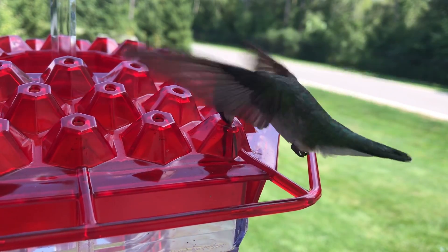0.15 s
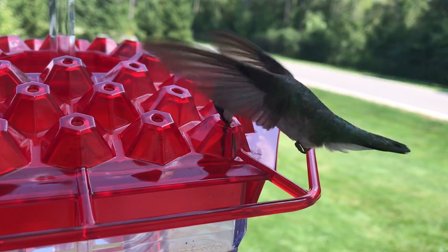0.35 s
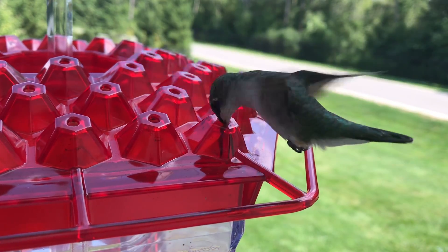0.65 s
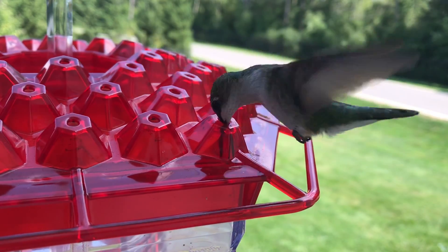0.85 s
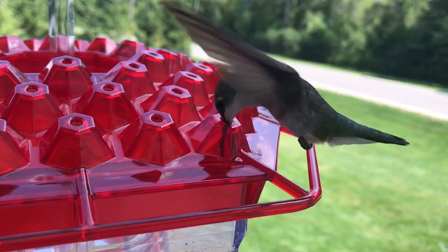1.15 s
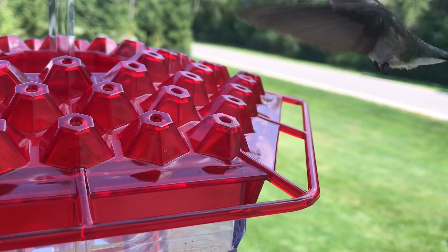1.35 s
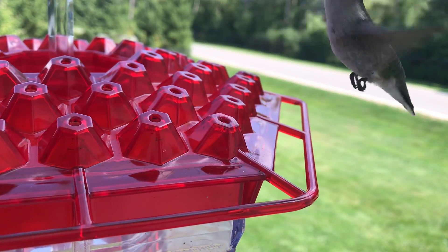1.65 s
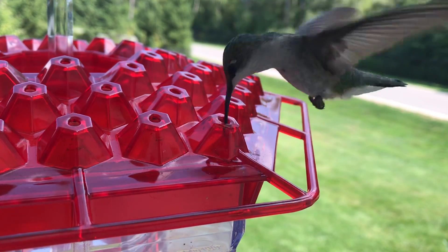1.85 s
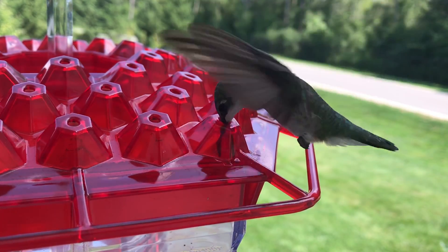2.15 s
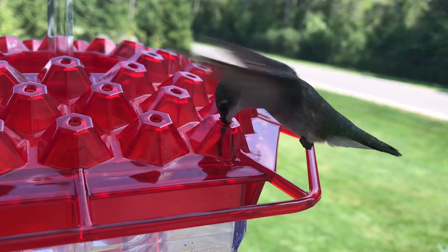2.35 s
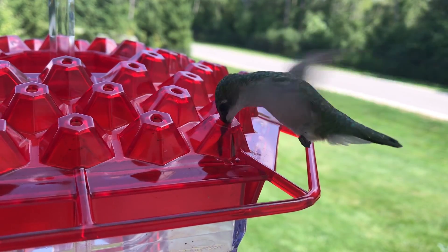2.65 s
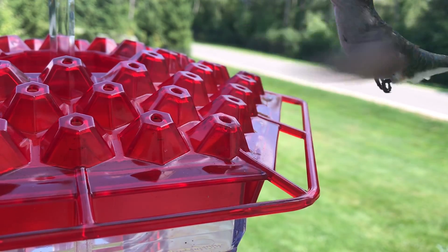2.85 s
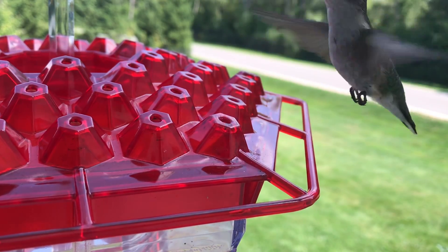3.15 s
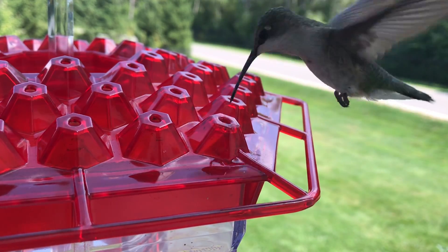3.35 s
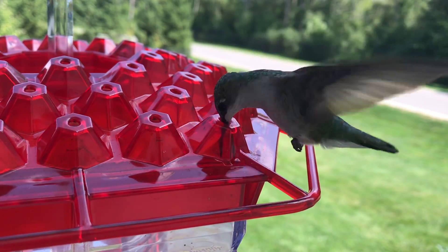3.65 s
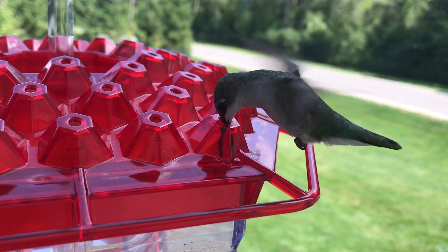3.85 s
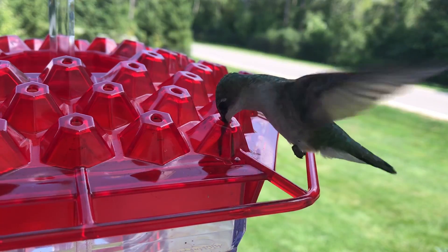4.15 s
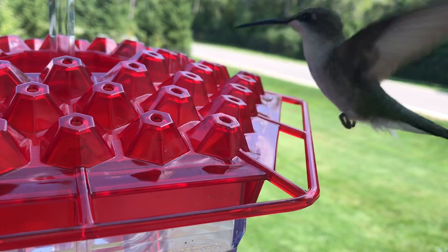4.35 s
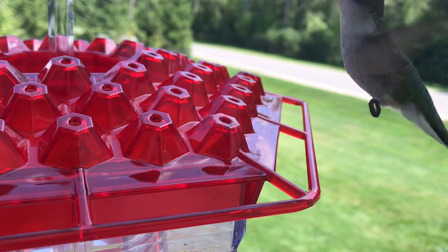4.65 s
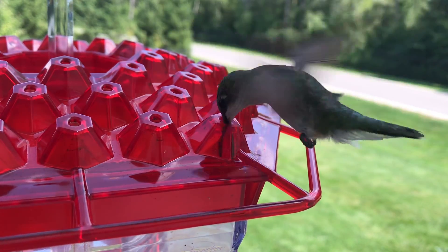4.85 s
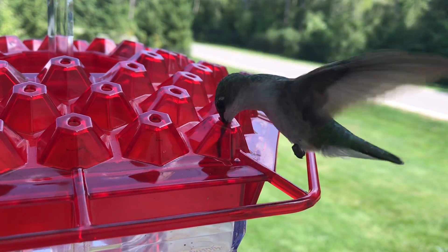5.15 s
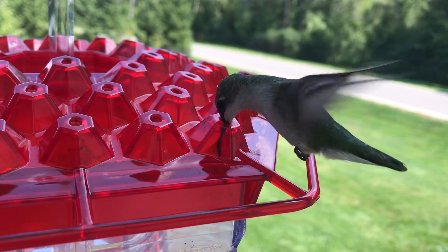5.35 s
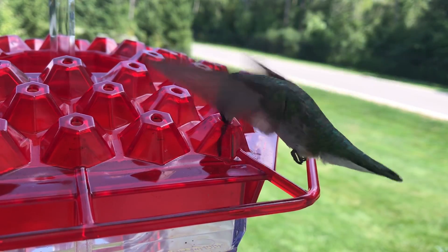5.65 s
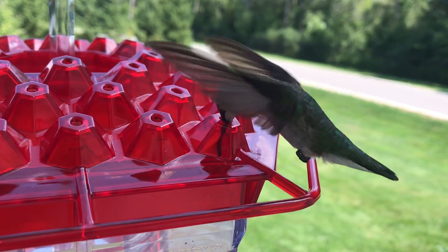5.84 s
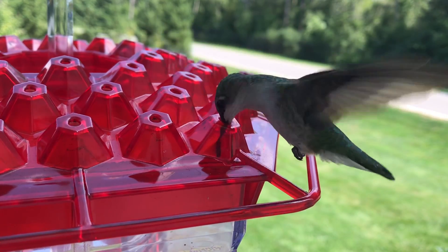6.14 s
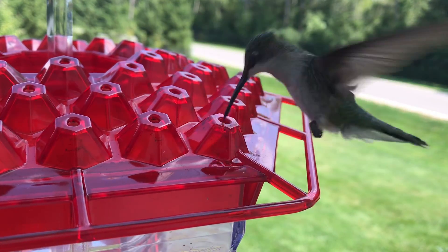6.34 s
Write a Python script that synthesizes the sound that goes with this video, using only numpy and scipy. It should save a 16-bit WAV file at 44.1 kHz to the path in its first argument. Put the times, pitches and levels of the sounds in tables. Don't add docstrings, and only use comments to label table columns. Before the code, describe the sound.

A hummingbird's wings drone in a low, fluttering hum close to the microphone, with crisp feather ticks and brief swells as it darts outdoors.

```python
import sys
import numpy as np
from scipy import signal
from scipy.fft import rfft, irfft, next_fast_len
from scipy.io import wavfile
from scipy.ndimage import map_coordinates

SR = 44100
rng = np.random.default_rng(int(sys.argv[2]) if len(sys.argv) > 2 else 0)


def volts_from_db(level):
    exponent = np.asarray(level, float) / 20
    return 10 ** exponent


def waveform_to_disk(signal):
    frames = np.transpose(np.atleast_2d(signal))
    scaled = np.clip(frames, -1, 1) * 32767
    samples = np.round(scaled).astype(np.int16)
    wavfile.write(sys.argv[1], SR, samples)


N = 286456

# time_s, beat_rate_hz
HOVER_BEAT = [(0.0, 47.37), (0.09, 47.55), (0.158, 45.61), (0.763, 44.1), (0.924, 46.51), (1.139, 44.72),
              (1.562, 47.78), (1.787, 42.58), (2.278, 46.87), (2.357, 44.7), (3.004, 46.56), (3.465, 41.0),
              (3.673, 43.78), (4.367, 43.91), (4.58, 48.06), (4.779, 42.55), (5.1, 44.72), (6.5, 44.64)]
# time_s, rise_hz, sag_hz, half_length_s
DARTS = [
    (1.299, 5.69, 6.37, .048),
    (2.023, 6.47, 0, .077),
    (2.841, 1.86, 4.8, .083),
    (3.566, 6.4, 0, .08),
    (4.418, 6.38, 6.71, .046),
    (4.996, 5.4, 1.31, .09),
    (6.345, -1.9, 0, .04),
    (6.435, 7.2, 0, .036),
]
# time_s, extra_air_db, half_length_s, swell_db
SURGES = [
    (1.315, 7.5, 0.035, 11.5),
    (2.055, 5, 0.043, 5),
    (2.826, 13, 0.028, 8.5),
    (3.602, 1, 0.033, 5.5),
    (4.426, 7, 0.025, 6.5),
    (5.002, 4, 0.027, 3),
    (6.447, 11, 0.037, 4),
]
# time_s, thrust_db, body_bob_db, stroke_sharpness_db, posture (0 bill in feeder, 1 upright backed off)
HOVER = [(0.0, -40, -42.5, -41.4, 0.031), (0.48, -41.5, -55.5, -52.5, 0.29),
         (0.86, -41.5, -41.5, -40.5, 0.05), (1.13, -39, -60, -48, 0.52), (1.48, -53.5, -52.7, -57, 0.84),
         (1.58, -46.0, -41.5, -47, 1), (1.77, -49.5, -46, -51.5, 0.8), (2.05, -42, -49.5, -46, 0.88),
         (2.37, -41, -44, -57.5, 0.7), (2.7, -43, -52, -57, 0.32), (3.0, -46.5, -50, -55.5, 0.74),
         (3.12, -42.5, -46, -48.5, 0.8), (3.32, -47, -47.5, -51.8, 0.68), (3.58, -41, -51.8, -50.5, 0.46),
         (4.18, -43, -64, -56.5, 0.078), (4.83, -36, -57, -54, 0.00055), (5.53, -38, -60, -53, -0.011),
         (6.5, -38.5, -51.5, -51.5, 0.21)]
# time_s, lopsided_db (once a beat), even_db (on both strokes)
TIPS = [(0, -53.5, -64), (.3, -55, -51), (.65, -58.5, -55.5), (1.1, -52, -60), (1.7, -51.5, -50),
        (2.1, -64, -51.5), (2.3, -63, -52.5), (2.75, -61, -59), (3, -54.5, -58), (3.35, -52, -55),
        (3.9, -53.5, -55), (4.3, -55, -57.5), (4.7, -52, -53), (5.3, -54.5, -56.5), (5.7, -55.5, -54),
        (6, -62, -55), (6.5, -59, -53)]
# multiple, level_column, share_db, lead_feeding_turns, lead_backed_off_turns
HARMONICS = [(1, 0, 0, .68, .21), (2, 1, 0, .37, .17), (3, 2, 0, .48, -.03), (4, 3, 0, .68, .12),
             (5, 4, -6, .75, .43), (6, 5, -5, .25, .31), (7, 4, -7, .49, .43), (8, 5, -13, .97, .11),
             (9, 4, -19, .38, .73)]
RAIL_DB = [5, 10.5, 0.33, .1, .1, 0.088]
SWELL_SHARE = [1.15, 1.1, 0.75, 0.37, .15, .05]
FADE_DB = [2.8, 0.63, 1.6, 1.6, 0.32, 0.36]
FADE_RATE = [16, 9, 11, 8.3, 7, 7]
# frequency_hz, density_db
WASH = [(40, -44), (75, -5.5), (110, 0), (160, 0.5), (200, -7.5), (290, -6.5), (400, -14), (480, -23.5),
        (700, -30.5), (1500, -112)]
# frequency_hz, density_db
BUFFET = [(16, -35), (28, -32), (45, -0.5), (65, 10.5), (80, -14), (110, -35), (200, -59)]
# time_s, peak_db, pitch_hz, lead_turns
THUMPS = [(2.131, -25, 96, .84), (3.3188, -32.5, 176, .32), (2.9, -40, 190, .27), (3.413, -37, 176, .32),
          (1.853, -35, 98, .4), (2.353, -31.5, 74, .48), (5.739, -39, 90, .66), (2.844, -30, 88, .45),
          (4.418, -34.5, 240, .02), (4.438, -34, 160, .088), (2.822, -35, 230, .02)]
# frequency_hz, density_db
SNAP = [(1760, -24), (3000, -12.5), (4870, -12.5), (6170, -3), (7040, -4), (7700, -6), (8790, -2),
        (10300, -6), (12400, -1.5), (15100, 0), (15700, -1)]
# time_s, peak_db
HARD_SNAPS = [(1.1408, -36), (1.2082, -38), (1.3324, -35), (2.2972, -37), (2.4299, -37), (2.4518, -39),
              (2.7152, -37), (2.9337, -40), (3.0255, -35), (3.0919, -39), (3.1138, -38), (3.1363, -37),
              (3.1582, -37), (3.3418, -38), (3.5902, -37), (4.5366, -38), (4.6927, -38), (5.0035, -37),
              (5.1547, -39), (5.3108, -37), (6.0057, -35), (6.0282, -39), (6.1848, -36), (6.2966, -38),
              (6.3654, -37)]
# frequency_hz, density_db
VORTEX = [(260, -47), (450, 0), (600, -0.5), (700, -9), (1100, -6), (1300, -9), (1850, -10), (2250, -18),
          (3200, -16), (4800, -23), (6240, -21), (10600, -120)]
# frequency_hz, density_db
GARDEN = [(60, -4), (300, -4.5), (700, 1), (1700, -2.5), (2400, -7.5), (3300, -8), (4900, -10.5),
          (6300, -7.5), (7700, -8), (8800, -10.5), (10400, -14), (12500, -13.5), (15700, -20)]
# frequency_hz, half_width_hz, gain_db
PORT_DIPS = [(4810, 180, 0), (7700, 170, -4.5), (10370, 230, -6)]


def seconds():
    return np.arange(N) / SR


def unit(x):
    return x / np.sqrt(np.mean(x ** 2) + 1e-20)


def curves(rows):
    s, *columns = np.transpose(rows)
    return [np.interp(seconds(), s, column) for column in columns]


def bumps(rows):
    t = np.arange(0, N + 64, 32) / SR
    total = sum(height * np.exp(-((t - s) / half_s) ** 2) for s, height, half_s in rows)
    return np.interp(seconds(), t, total)


def wobble(rate):
    knots = rng.standard_normal(int(N * 100 / SR) + 4)
    return map_coordinates(knots, [np.arange(N) * min(rate, 99) / SR])


def coloured(x, spectrum):
    size = next_fast_len(N + 8192)
    hz, db = np.transpose(spectrum)
    log_hz = np.log(np.fft.rfftfreq(size, 1 / SR) + 1)
    gain = volts_from_db(np.interp(log_hz, np.log(hz + 1), db))
    return unit(irfft(rfft(x, size) * gain, size)[:N])


def sag():
    delay_s, half_s = .0972, .07
    return bumps([(s + delay_s, drop, half_s) for s, _, drop, _ in DARTS])


def beat_rate():
    return curves(HOVER_BEAT)[0] + bumps([(s, rise, half_s) for s, rise, _, half_s in DARTS]) - sag()


def turns():
    return .1412 + np.cumsum(beat_rate()) / SR


def surge_db():
    return bumps([row[:3] for row in SURGES])


def swell_db():
    return bumps([(s, db, 1.32 * half_s) for s, _, half_s, db in SURGES])


def loose():
    off_s, on_s, let_go_s = 4.248, 5.73, 0.0054
    t = seconds()
    return (np.tanh((t - off_s) / let_go_s) - np.tanh((t - on_s) / let_go_s)) / 2


def stroke(at, rise_s, fall_s, scatter_db, scatter_turns):
    since = turns() - at
    beat = np.floor(since + .5).astype(int) + 1
    chance = rng.standard_normal((400, 2))[beat]
    late_turns = since - beat + 1 - scatter_turns * chance[:, 0]
    late_s = late_turns / beat_rate()
    pulse = np.exp(np.where(late_s < 0, late_s / rise_s, -late_s / fall_s))
    return volts_from_db(scatter_db * chance[:, 1]) * pulse


def wing_levels():
    thrust, bob, sharp, away = curves(HOVER)
    fourth = 20 * np.log10(np.hypot(volts_from_db(sharp - 7.5), volts_from_db(-55 - 12.5 * away)))
    steady = [bob, thrust, sharp, fourth] + curves(TIPS)
    off, swell = loose(), swell_db()
    columns = zip(steady, RAIL_DB, SWELL_SHARE, FADE_DB, FADE_RATE)
    return [db - rail * off + share * swell + fade * wobble(rate)
            for db, rail, share, fade, rate in columns]


def hum():
    away, levels, out = curves(HOVER)[3], wing_levels(), 0
    clock = turns() + (.006 + .007 * away) * wobble(40)
    sharper_db = 0.48 * surge_db()
    upright_db = 4.2 * away
    effort_db = (.9 + 1.1 * np.abs(away)) * wobble(45)
    for k, column, share_db, feeding, backed in HARMONICS:
        lead = feeding + (backed - feeding) * away + .007 * k * wobble(7)
        level_db = levels[column] + share_db + effort_db + .18 * k * wobble(9)
        level_db = level_db + (k > 3) * sharper_db + (k in (5, 8, 9)) * upright_db
        out = out + np.sqrt(2) * volts_from_db(level_db) * np.cos(2 * np.pi * (k * clock + lead))
    return out


def gusts():
    t, out = seconds(), np.zeros(N)
    for s, db, hz, lead in THUMPS:
        wave = np.cos(2 * np.pi * (hz * (t - s) + lead))
        out += volts_from_db(db) * wave * np.exp(-((t - s) * hz / 0.68) ** 2)
    return out


def downwash():
    off = loose()
    bob_db = curves(HOVER)[1] - RAIL_DB[0] * off
    flow_db = -51.1 + 0.07 * (bob_db - bob_db.mean()) - 0.5 * off
    flow_db = flow_db + 2 * wobble(5) + 1.4 * curves(HOVER)[3] + 0.4 * surge_db()
    pulse = .5 + stroke(0.097, 0.0039, 0.007, 2.4, 0.027)
    wash = volts_from_db(flow_db) * coloured(pulse * rng.standard_normal(N), WASH)
    buffet = volts_from_db(.75 * bob_db - 15.5) * coloured(rng.standard_normal(N), BUFFET)
    return wash + buffet + gusts()


def hard_snaps():
    t, hard = seconds(), np.zeros(N)
    for s, db in HARD_SNAPS:
        hard += volts_from_db(db + 54.0) * np.exp(-np.abs(t - s - .001) / 0.00018)
    return hard * rng.choice([-1, 1], N)


def downstroke(level_db):
    build = stroke(.99, .0015, .0008, 1.2, .008)
    crack = stroke(.995, .00025, .00025, 2.2, .012)
    rustle = (1.5 * build + 0.35 * crack) * rng.standard_normal(N)
    return volts_from_db(level_db) * coloured(rustle + 0.48 * hard_snaps(), SNAP)


def upstroke(level_db):
    swish = stroke(.47, .0006, .0019, 1.8, .012)
    brighter = [(hz, db + 2.8 * np.log2(hz / 12000)) for hz, db in SNAP]
    return volts_from_db(level_db) * coloured(swish * rng.standard_normal(N), brighter)


def vortices(level_db):
    up = stroke(.534, .0016, .0027, 2.6, .04)
    shed = 0.5 + up + 0.98 * stroke(.12, 0.0023, 0.0025, 0.98, 0.029)
    return volts_from_db(level_db) * coloured(shed * rng.standard_normal(N), VORTEX)


def feathers():
    thrust, _, _, away = curves(HOVER)
    thrust_db = thrust - RAIL_DB[1] * loose()
    swell, surge, slack = swell_db(), surge_db(), sag()
    vortex_db = -61.5 + .5 * swell + 0.33 * surge - .5 * slack
    vortex_db = vortex_db + 0.21 * (thrust_db - thrust_db.mean()) + 0.57 * wobble(7)
    snap_db = -59 + 0.33 * swell + 0.11 * surge - .4 * slack + 0.43 * wobble(3.9)
    down = downstroke(snap_db + .7 + 0.64 * away)
    up = upstroke(snap_db - 1.0 - 1.2 * away)
    return down + up + vortices(vortex_db)


def garden():
    return volts_from_db(-62.5 + 0.067 * wobble(1.35)) * coloured(rng.standard_normal(N), GARDEN)


def scene():
    return (hum() + downwash() + feathers() + garden())[None]


def top_cut(x):
    return signal.sosfilt(signal.butter(12, 15880, fs=SR, output="sos"), x)


def record(dry):
    hz = np.fft.rfftfreq(N, 1 / SR)
    port_db = sum(db * np.exp(-((hz - dip_hz) / width_hz) ** 2) for dip_hz, width_hz, db in PORT_DIPS)
    below_limit = hz < 15850
    mix = irfft(rfft(dry) * volts_from_db(port_db) * below_limit, N)
    return top_cut(mix)


dry = scene()
out = record(dry)
waveform_to_disk(out)
```